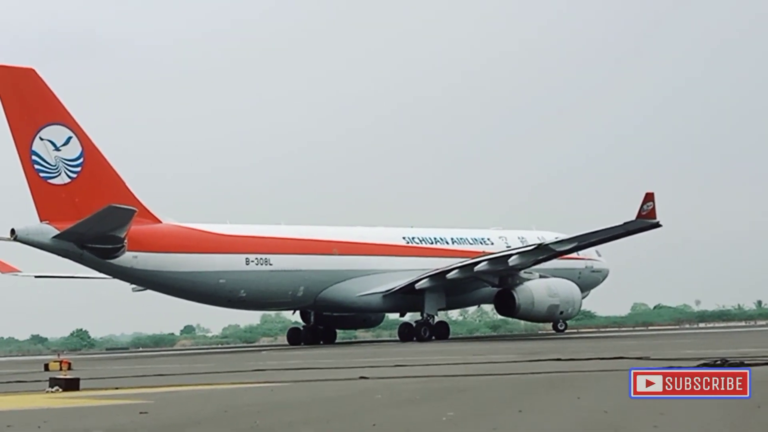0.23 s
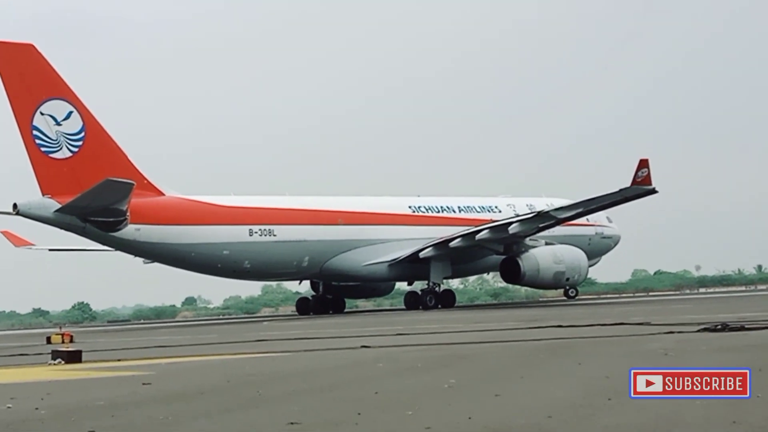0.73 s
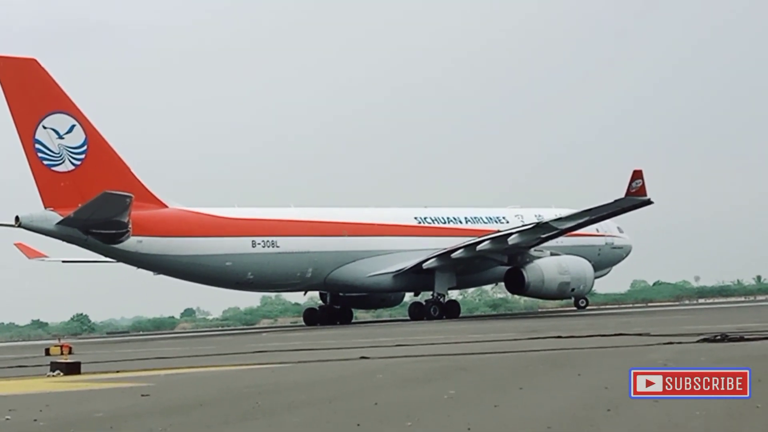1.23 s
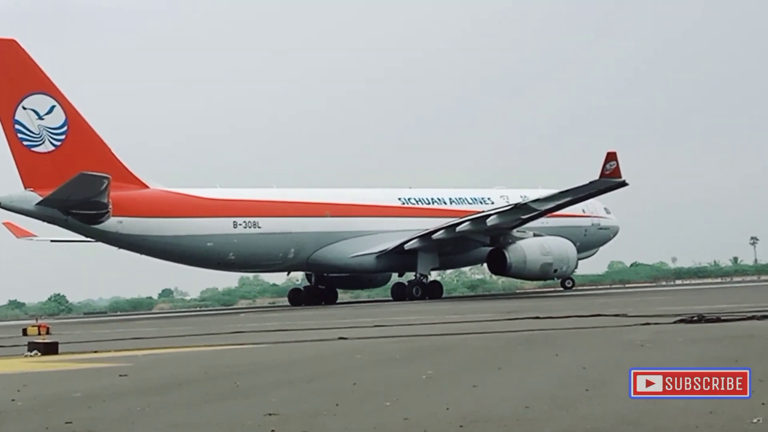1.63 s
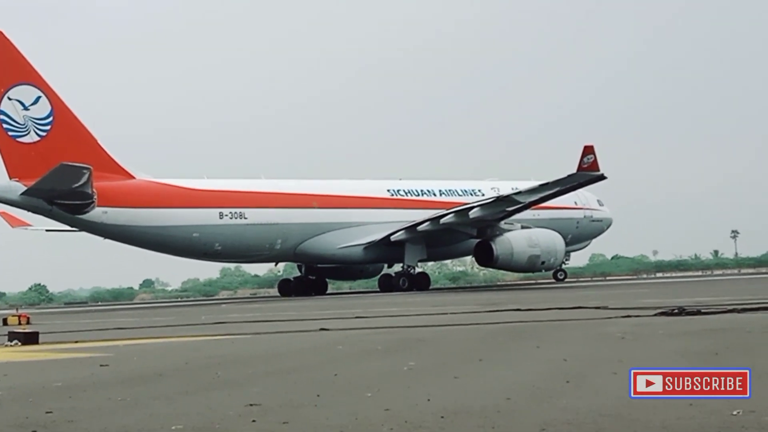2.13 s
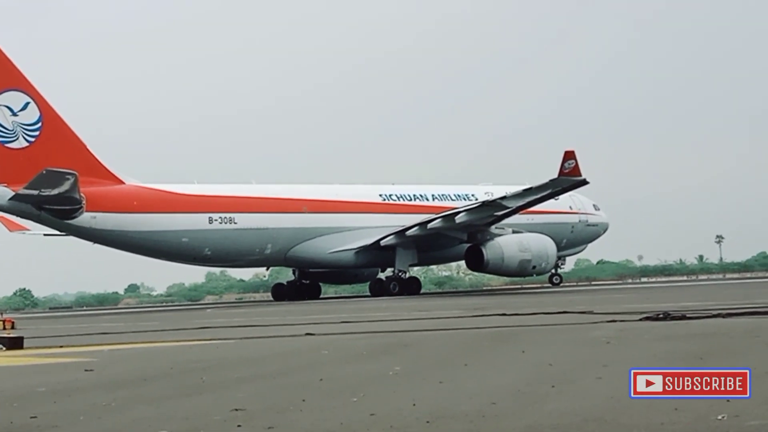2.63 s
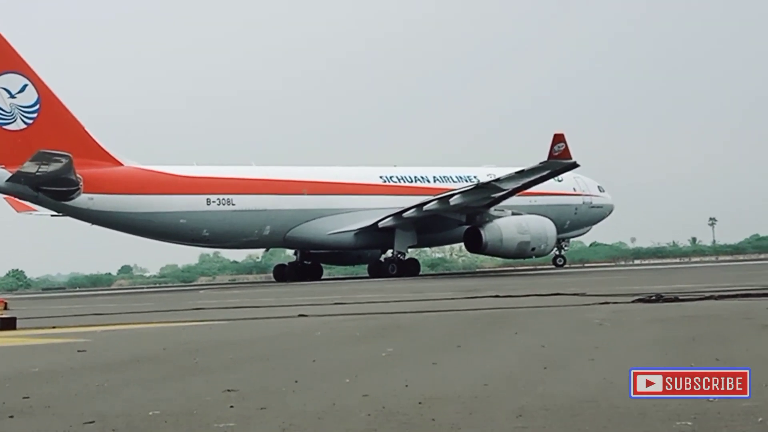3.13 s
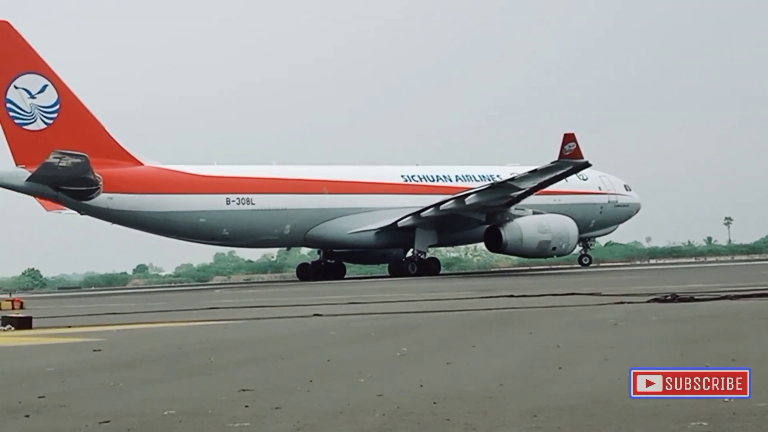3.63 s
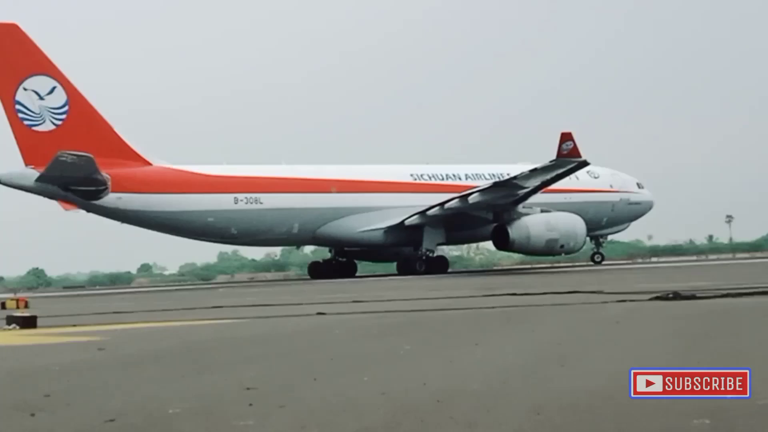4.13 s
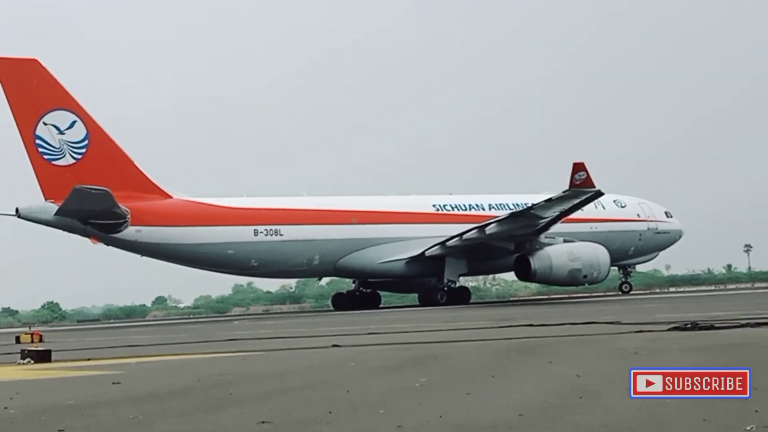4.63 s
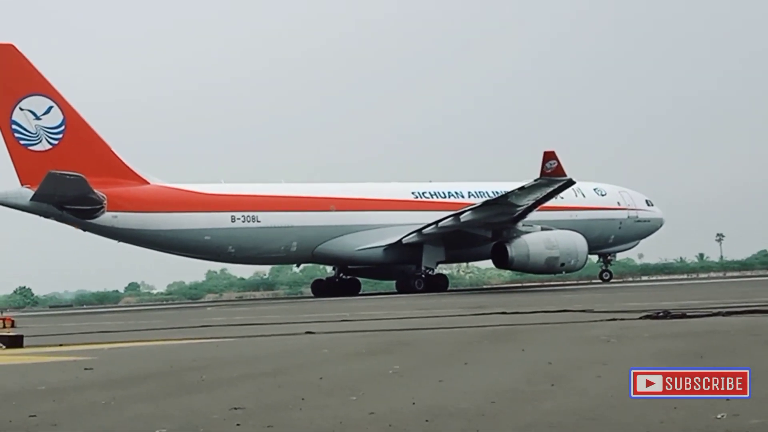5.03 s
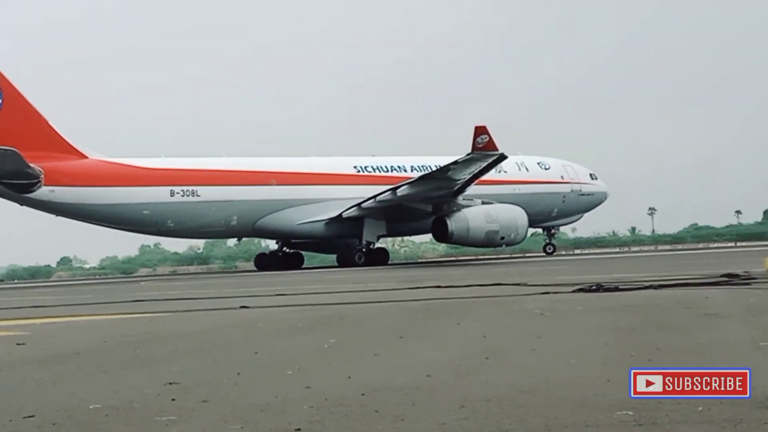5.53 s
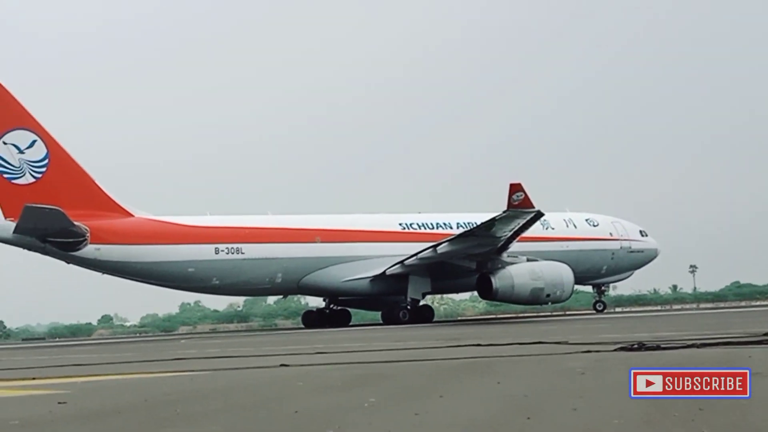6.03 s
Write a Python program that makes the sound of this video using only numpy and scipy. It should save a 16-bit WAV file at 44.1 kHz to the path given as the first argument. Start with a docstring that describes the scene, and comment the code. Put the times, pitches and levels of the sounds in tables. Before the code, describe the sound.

Steadily swelling jet engine roar and breathy rush with faint whining tones, low throbbing rumbles and gusty wind thumps on a hand-held stereo microphone.

```python
"""Open, breezy airfield, a hand-held stereo microphone near a taxiing twin-jet airliner.
From the start gusts buffet both microphone ports, and noise in bands makes the engines' rumble, roar, rush and hiss.
The low noises grow for six seconds as the tails swing round; thin engine tones and broad fuzzy humps come and go.
Brief swells of the low rumble, wavering sines near 94 and 140 Hz, are scattered from about 2.3 s to the end.
From about 3.7 s something, likely a finger, slides over the right port and filters that side until it is muffled."""
import sys
import numpy as np
from scipy import signal
from scipy.io import wavfile
from scipy.ndimage import uniform_filter1d

SR = 44100
rng = np.random.default_rng(int(sys.argv[2]) if len(sys.argv) > 2 else 0)


def int16_out(signal):
    """Quantize to a 16-bit WAV file."""
    q = np.round(np.clip(np.atleast_2d(signal).T, -1, 1) * 32767)
    wavfile.write(sys.argv[1], SR, q.astype(np.int16))


N = 276639


def gain_of(db):
    """Decibels to amplitude."""
    return 10 ** (np.asarray(db) / 20)


def evened(x):
    """Scales to rms 1."""
    return x / np.sqrt(np.mean(abs(x) ** 2) + 1e-20)


def read(points, hz, axis=1):
    """One column of a spectrum table, joined on a log-frequency axis."""
    table = np.transpose(points)
    return np.interp(np.log(hz + 1), np.log(table[0] + 1), table[axis])


def stretched(coarse):
    """Spreads a coarse curve over all samples."""
    return np.interp(np.arange(N), np.linspace(0, N - 1, len(coarse)), coarse)


def hump(t, peak_s, rise_s, fall_s):
    """A smooth rise from 0 to 1 and a smooth fall back."""
    from_peak = np.maximum((peak_s - t) / rise_s, (t - peak_s) / fall_s)
    return np.cos(np.pi / 2 * np.clip(from_peak, -1, 1)) ** 2


def drift(rate_hz, size=2048):
    """Complex chance of rms 1 that changes about rate_hz times a second, on a coarse time grid."""
    hz = np.fft.fftfreq(size, N / SR / size)
    a, b = rng.standard_normal((2, size))
    slow_spectrum = (a + 1j * b) * np.exp(-.5 * (hz / rate_hz) ** 2)
    return evened(np.fft.ifft(slow_spectrum))


def patches(shape, size):
    """Smooth chance of rms 1 over (frames, bins), in blobs of the given size."""
    along_time = uniform_filter1d(rng.standard_normal(shape), size[0], 0)
    return evened(uniform_filter1d(along_time, size[1], 1))


def turbulence(colour, level, skirt_db, shared=True, flutter_db=0.46, size=4096):
    """Broad noise at both ports on a level curve (s, dB); beyond its colour table it falls by skirt_db an octave."""
    # likeness of the sound at the two ports: pitch_hz, coherence (0-1)
    likeness = [(100, 1), (400, 0.99), (900, 1), (1600, 0.74), (3300, 0.81), (4750, 0.82), (5600, 0.61),
                (6200, 0.16), (7200, 0.2), (13000, 0.59)]
    hz = np.fft.rfftfreq(size, 1 / SR)
    shape = (4 * N // size + 3, len(hz))
    a, b, c, d = rng.standard_normal((4, *shape))
    left, stranger = a + 1j * b, c + 1j * d
    same = shared * np.clip(read(likeness, hz), 0, 1)
    ports = np.array([left, same * left + np.sqrt(1 - same ** 2) * stranger])

    octaves_out = abs(np.log2((hz + 1) / np.clip(hz + 1, colour[0][0], colour[-1][0])))
    field_db = read(colour, hz) - skirt_db * octaves_out
    field_db = field_db + .5 * patches(shape, size=(6, 40))  # hot, moving air makes bands come and go
    field_db = field_db + patches(shape, size=(70, 3))  # reflections comb the sound by a decibel, shifting slowly

    spectra = (ports * gain_of(field_db)).swapaxes(1, 2)
    sound = signal.istft(spectra, nperseg=size, noverlap=size - size // 4)[1][:, :N]
    wobble_db = flutter_db * stretched(drift(7.4).real)
    level_db = np.interp(np.arange(N) / SR, *level) + wobble_db
    return sound / np.std(sound[0]) * gain_of(level_db)


def wind(breeze_db=-47.5, rise_share=0.47, lee_db=-5):
    """Eddies buffet each port separately; gusts rise out of a light breeze."""
    # colour of the wind on the microphone: pitch_hz, relative density_db (per Hz)
    wind_colour = [(25, -33), (42, -18.3), (60, -7), (100, -3), (170, 0), (300, -5.5), (450, -14),
                   (700, -14.5)]
    # gusts at the left port, added to the breeze as power: peak_s, length_s, level_db
    gusts = [(0.017, 0.9, -44.5), (0.62, 0.36, -41), (1.25, 0.52, -49), (1.76, 0.41, -39),
             (2.248, 0.3, -37), (2.42, 0.22, -38), (2.705, 0.41, -38.5), (2.92, 0.26, -34),
             (3.598, 0.36, -50), (4.2, 0.54, -43), (4.44, 0.3, -40), (5.55, 0.21, -60), (5.935, 0.45, -47),
             (6.262, 0.27, -42)]
    t = np.arange(0, N, 256) / SR
    power = gain_of(breeze_db) ** 2
    for peak_s, length_s, gust_db in gusts:
        rise_s, fall_s = rise_share * length_s, (1 - rise_share) * length_s
        power = power + gain_of(gust_db) ** 2 * hump(t, peak_s, rise_s, fall_s)
    buffeting = turbulence(wind_colour, (t, 10 * np.log10(power)), skirt_db=9.5, shared=False)
    return buffeting * gain_of([[0], [lee_db]])  # the right port is turned away from the wind


def tones_and_humps(steady=0.65, apart=0.5, trim_db=-.5, core_s=0.32):
    """Each is a steady line plus a part scattered by turbulent air, a little unlike at the two ports."""
    # thin engine tones, and broad fuzzy humps where an echo reinforces the rush: pitch_hz, width_hz,
    # peak_db (before the trim), strongest_s, fade_db_per_s (on either side of that time)
    lines_table = [(57, 5, -53.5, 4.2, 3), (97, 4, -45, 2.5, 3.3), (114, 5, -46.5, 1.4, 3),
                   (143, 8, -45.5, 4.0, 2.8), (168, 10, -51, 2.6, 3), (383, 9, -45, 3.9, 2.2),
                   (406, 9, -50, 2.9, 2), (482, 7, -46.5, 4.6, 6), (610, 45, -48, 3.8, 5),
                   (770, 11, -49, 4.2, 2.8), (1071, 3, -56.5, 4.0, 2), (1750, 70, -57.5, 2.6, 5),
                   (2080, 60, -50.5, 3.2, 6.5), (2220, 3, -49.5, 4.6, 4), (2245, 3, -49, 5.9, 10),
                   (2334, 3, -48.5, 3.7, 5.5), (2390, 14, -49.5, 3.7, 7), (2435, 24, -48, 3.85, 9),
                   (2939, 4, -58, 2.2, 3.5), (3321, 3, -53.5, 4.6, 3), (6488, 4, -66, 5.8, 3.5)]
    t, out = np.arange(N) / SR, np.zeros((2, N))
    steady = np.clip(steady, 0, 1)
    for hz, width_hz, peak_db, strongest_s, fade_db_per_s in lines_table:
        wander, scatter, unlike = (drift(width_hz / 2) for _ in range(3))
        grid = np.linspace(0, t[-1], len(wander))
        blur = np.exp(1j * np.pi * width_hz * grid[1] * np.cumsum(wander.real))  # pitch wavers within the width
        scattered = scatter + apart * np.array([unlike, -unlike])
        lines = evened(steady * blur + (1 - steady) * scattered)
        off_peak_s = np.hypot(grid - strongest_s, core_s) - core_s  # the level has a rounded top
        lines = lines * gain_of(peak_db - fade_db_per_s * off_peak_s)
        carrier = np.sqrt(2) * np.exp(2j * np.pi * hz * t)
        out += [(stretched(line) * carrier).real for line in lines]
    return out * gain_of(trim_db)


def rumble_swells(length_s=0.2, waver_hz=3.83):
    """Brief swells of the low rumble near 94 and 140 Hz, each a sine of wavering pitch, alike at both ports."""
    # brief swells of the low rumble: peak_s, pitch_hz, level_db (rms at the peak)
    swells = [(2.27, 140, -45.5), (2.72, 93.7, -37.5), (2.81, 139.8, -41), (2.97, 142, -41),
              (3.9, 139, -38.5), (4.23, 145.4, -47), (4.69, 94, -40), (6.25, 147, -36)]
    t, out = np.arange(N) / SR, np.zeros(N)
    for peak_s, hz, swell_db in swells:
        pitch_hz = hz + waver_hz * stretched(drift(8).real)
        turns = np.cumsum(pitch_hz) / SR + rng.random()
        envelope = hump(t, peak_s, length_s / 2, length_s / 2)
        out += gain_of(swell_db) * envelope * np.sqrt(2) * np.sin(2 * np.pi * turns)
    return out


def engine_level(t, full_db, climb_db, swell_s=6, bend=2.85):
    """Level (dB) of a low engine noise, swelling as the tails swing towards the microphone (bend 1 = straight)."""
    return full_db - climb_db * np.maximum(1 - t / swell_s, 0) ** bend


def near_echo(x, delay_s=.00285, drift_s_per_s=.00001, share=0.029, right_extra=0.17, ends_s=3.9, fade_s=0.3):
    """A short echo off something near combs the treble, stronger at the right port until the finger screens it."""
    t = np.arange(N) / SR
    late = np.array([np.interp(t - delay_s - drift_s_per_s * t, t, port) for port in x])
    unscreened = np.clip((ends_s - t) / fade_s, 0, 1)
    return x + (share + np.outer([0, right_extra], unscreened)) * late


def jets(rush_db=-1.0, rasp_db=-0.43, hiss_db=-0.25, fizz_db=-32.5, fizz_follows=0.8):
    """The broad noises of the engines, from the deep core to the finest fizz of the turbine."""
    # colour of each noise, deep to fine: pitch_hz, relative density_db (per Hz)
    rumble_colour = [(25, -32.9), (42, -22), (54, -13), (68, -12), (88, 3.5), (120, 1.5), (160, 3.5),
                     (200, -11)]
    roar_colour = [(200, -6.5), (290, -5), (400, -1.5), (480, -2.2), (515, -0.5), (550, -5), (600, -4),
                   (660, -1.5), (735, -9), (790, -4), (870, -8), (1150, -14)]
    rush_colour = [(1120, -9), (1210, -6.5), (1290, -2), (1480, -1), (1585, -6), (1720, -1), (1790, -2),
                   (1865, -3.5), (1970, 1), (2160, 1), (2270, 0), (2340, 1), (2490, -0.5), (2620, -5)]
    rasp_colour = [(2620, 0), (2740, 4.5), (2820, 3.5), (2920, 3), (2990, -3.5), (3100, 1.5), (3330, 1.5),
                   (3580, -0.5), (3780, 1), (3930, -0.5), (4120, 4), (4330, -3.5), (4530, 2), (4700, -2.5)]
    hiss_colour = [(4700, -6), (5050, -0.5), (5350, 4), (5580, 1.5), (5820, 1.5), (6250, -8), (6800, -10.5),
                   (7600, -18), (8200, -23)]
    fizz_colour = [(8200, -13.5), (9200, 2), (9800, -1), (10600, 0.5), (12300, -6.5), (14000, -10)]
    # treble swelling and ebbing through the moving air: time_s, rush_db, rasp_db, hiss_db (before the trims)
    treble = [(0.02, -50.5, -54.5, -55.5), (0.5, -45.5, -49, -51.5), (0.8, -45.5, -45.5, -48),
              (1.08, -43.5, -43, -46.5), (1.5, -41.5, -44.5, -49), (1.9, -40.5, -44.5, -45.5),
              (2.4, -39, -41, -43), (2.85, -38, -43.5, -44), (3.45, -37.5, -38, -38),
              (3.72, -36, -36, -38.5), (4.15, -35.5, -38.6, -40.5), (4.5, -36.0, -38.5, -41.1),
              (4.85, -37, -38.5, -41.5), (5.15, -36, -40.5, -40), (5.42, -34.5, -39, -38.5),
              (5.85, -34, -37, -34), (6.02, -34.5, -37.5, -35.5), (6.12, -33.5, -34, -28),
              (6.26, -32, -32.5, -31)]
    # a long surge in which the rumble heaves up: peak_s, rise_s, fall_s, lift_db
    surges = [(2.8, 1, 0.42, 1)]
    t = np.arange(0, N, 256) / SR
    surge_db = sum(lift_db * hump(t, peak_s, rise_s, fall_s) for peak_s, rise_s, fall_s, lift_db in surges)
    sink_db = 0.5 * np.maximum(t - 3.25, 0)  # dB per s, from 3.25 s: the aircraft draws away

    rumble_level = engine_level(t, full_db=-40.5, climb_db=16) + surge_db - sink_db
    roar_level = engine_level(t, full_db=-35.0, climb_db=12.1) + 0.15 * surge_db  # shares little of the surge
    rumble = turbulence(rumble_colour, (t, rumble_level), skirt_db=59)
    roar = turbulence(roar_colour, (t, roar_level), skirt_db=79)

    when, rush_level, rasp_level, hiss_level = np.transpose(treble)
    rush = turbulence(rush_colour, (when, rush_level + rush_db), skirt_db=115)
    rasp = turbulence(rasp_colour, (when, rasp_level + rasp_db), skirt_db=200)
    hiss = turbulence(hiss_colour, (when, hiss_level + hiss_db), skirt_db=195, flutter_db=0.8)
    fizz_level = fizz_follows * hiss_level + fizz_db
    fizz = turbulence(fizz_colour, (when, fizz_level), skirt_db=150, flutter_db=1.3)
    return rumble + roar + near_echo(rush + rasp + hiss) + fizz


def scene():
    """Engine noise, swells of its low rumble, the tones and humps standing in it, and the wind."""
    return jets() + rumble_swells() + tones_and_humps() + wind()


def right_port(x, cup_from_hz=1500, cup_full_hz=4300, size=2048):
    """The finger first cups the port, lifting its treble, then slides its resonance down and shuts it."""
    # finger over the port: time_s, position (0 open, 1 shading, 2 shut),
    # slide_octaves (shift of the shaded resonance), cup_db (treble lift by cupping)
    finger = [(3.68, 0.028, 0.2, 1.5), (3.87, 0.37, 0.027, 2), (4.03, 0.63, 0.048, 7),
              (4.17, 1.04, -0.028, 4), (4.6, 1.06, -0.037, 1.5), (4.92, 0.91, -0.067, -3),
              (5.16, 1.26, -0.1, -0.5), (5.38, 1.96, -0.3, 2)]
    # right port against the left one when open, shaded and shut: pitch_hz, gain_db, lag_radians
    port_open = [(100, -1.2, 0.1), (950, 0.5, 0.0), (1200, -2.0, 0.0), (1480, -1.0, 0.3),
                 (1560, -1.0, -1.3), (1610, -1.0, -1.2), (1730, 1.0, 0.0), (1860, -1.0, 0.7),
                 (1980, 0.0, 0.1), (2150, 0.5, 0.4), (2215, -0.5, 0.6), (2250, -1.5, 1.9),
                 (2290, -1.5, 2.1), (2315, 0.5, -0.6), (2390, 2.2, -0.4), (2540, -1.0, -0.3),
                 (2640, -1.5, -1.3), (2740, -4.5, -0.8), (3000, -0.5, -0.75), (3480, -2.5, -0.9),
                 (3700, 3.0, -0.75), (4100, 6.5, -0.4), (4340, 9.0, 0.0), (4550, 4.8, 0.2),
                 (4900, 5.5, 0.6), (5400, -3.5, 1.6), (6000, -7.0, 2.2), (7200, -1.0, 3.4),
                 (8200, 0.0, 3.6), (10000, 8.5, 3.6), (13000, 17.0, 5.2)]
    port_shaded = [(100, -1.5, 0.0), (900, 1.0, 0.1), (1450, -2.0, 0.1), (2300, 0.0, -0.1),
                   (3200, 2.2, 0.0), (3550, 4.5, 0.15), (3900, 8.0, 0.8), (4300, 5.8, 1.7),
                   (4550, 1.0, 2.5), (4900, -1.0, 3.14), (5100, -7.0, 3.4), (5350, -18.0, 3.4),
                   (6000, -21.0, 3.3), (7000, -16.0, 2.5), (9000, 3.0, 3.1), (10800, 11.0, 4.5),
                   (12000, 9.0, 5.3), (13500, 3.0, 6.0)]
    port_shut = [(100, -3.5, 0.1), (500, -2.0, 0.5), (900, -0.5, 1.2), (1300, -9.0, 1.9),
                 (1600, -17.0, 2.6), (1900, -19.0, -0.2), (2400, -10.0, 0.2), (3200, -7.0, 1.0),
                 (3600, -7.5, 1.9), (3950, -10.0, 3.1), (4300, -22.0, 3.5), (4550, -38.0, 3.6),
                 (4900, -30.0, 2.5), (5900, -35.0, 1.3), (6400, -21.0, 1.8), (8000, -6.2, 3.0),
                 (11000, 1.0, 5.8), (13500, -8.0, 6.6)]
    hz, t, z = signal.stft(x, SR, nperseg=size)
    when, *columns = np.transpose(finger)
    position, slide_octaves, cup_db = (np.interp(t, when, column) for column in columns)
    gain_db = np.outer(np.interp(hz, [cup_from_hz, cup_full_hz], [0, 1]), cup_db)
    turn = 0
    for state, port in enumerate([port_open, port_shaded, port_shut]):
        share = np.maximum(1 - abs(np.clip(position, 0, 2) - state), 0)
        slides = state == 1  # only the shaded resonance moves: a narrower gap resonates lower
        slid_hz = np.outer(hz, 2 ** (-slide_octaves * slides))
        gain_db = gain_db + share * read(port, slid_hz, axis=1)
        turn = turn + share * np.exp(-1j * read(port, slid_hz, axis=2))
    filtered = z * gain_of(gain_db) * np.exp(1j * np.angle(turn))
    return signal.istft(filtered, SR, nperseg=size)[1][:N]


def record(dry, edge_hz=14000):
    """The left port hears freely, the right one past the finger; then a low-pass limits the band."""
    dry = dry * signal.windows.tukey(N, .001)  # very short fades at both ends
    ports = np.array([dry[0], right_port(dry[1])])
    low_pass = signal.firwin(255, edge_hz, window=("kaiser", 8), fs=SR)
    return signal.oaconvolve(ports, low_pass[None], "same")


dry = scene()
out = record(dry)
int16_out(out)
```